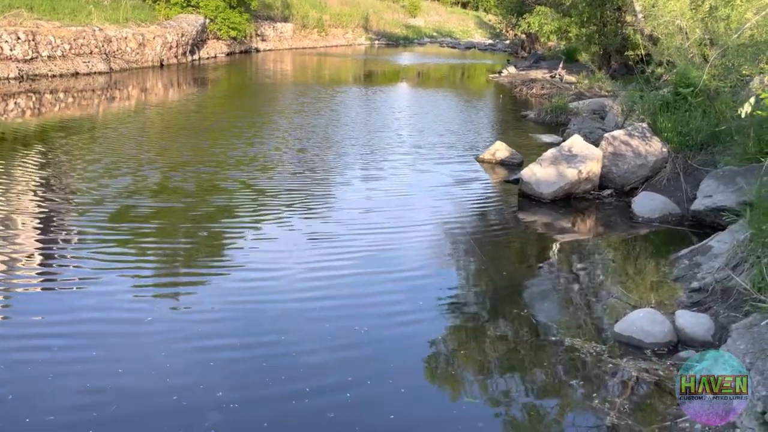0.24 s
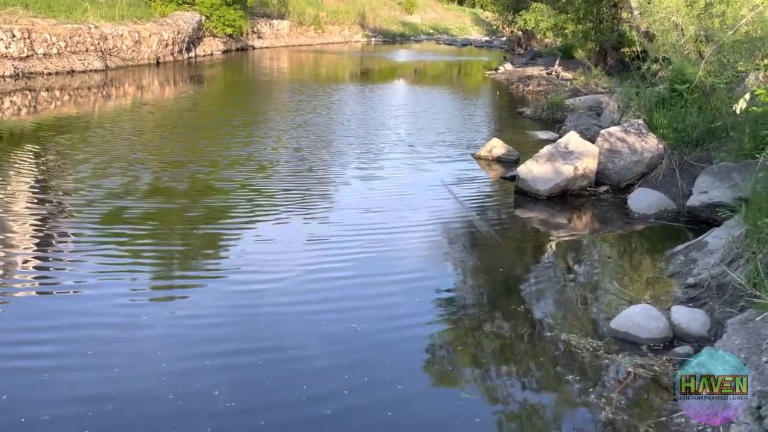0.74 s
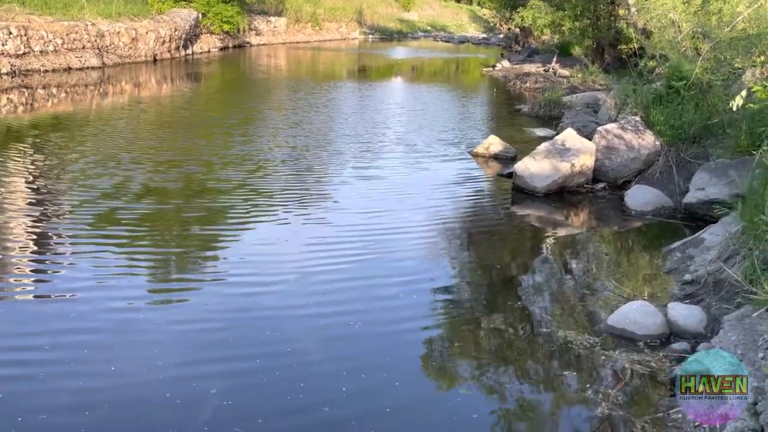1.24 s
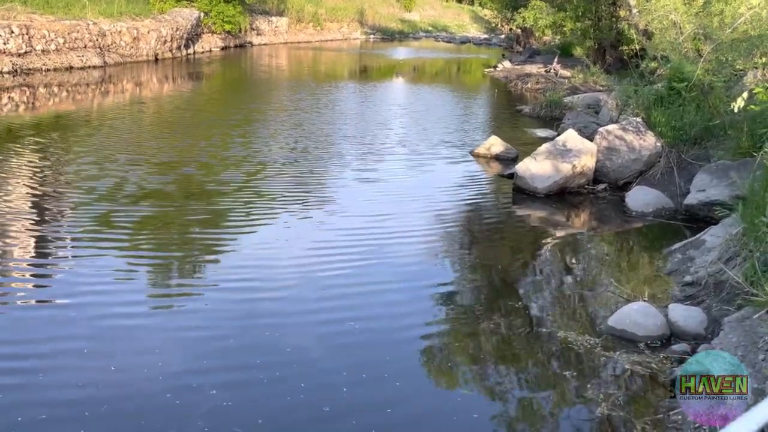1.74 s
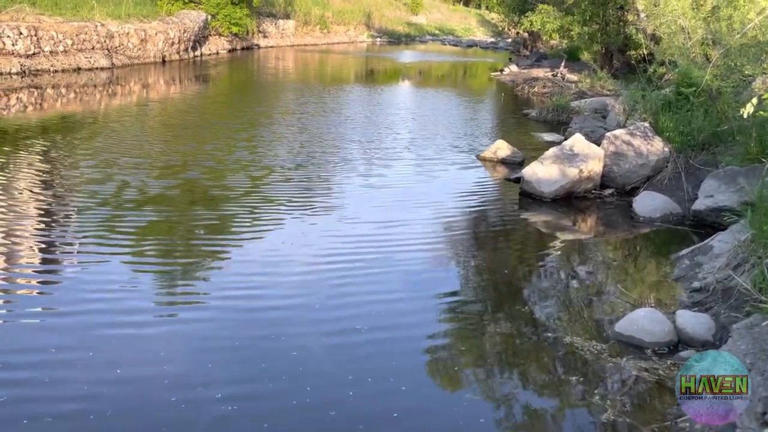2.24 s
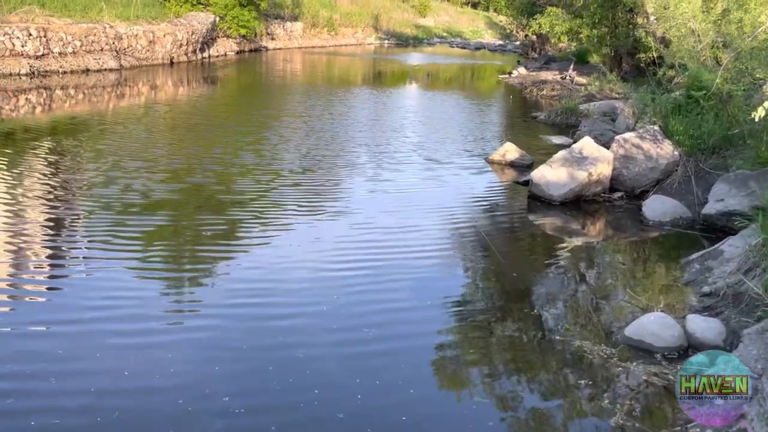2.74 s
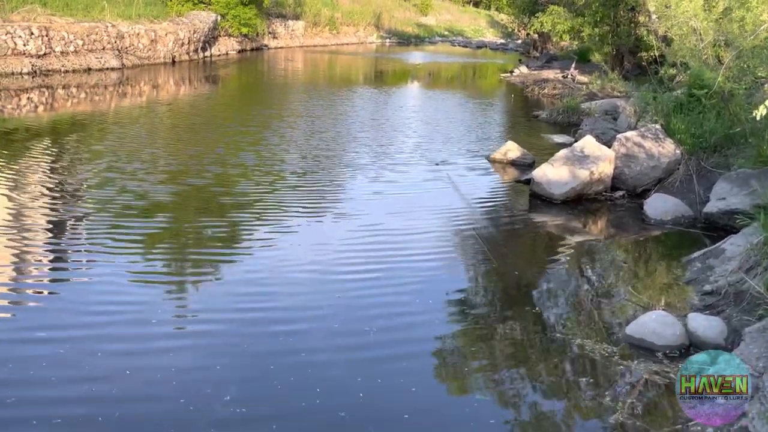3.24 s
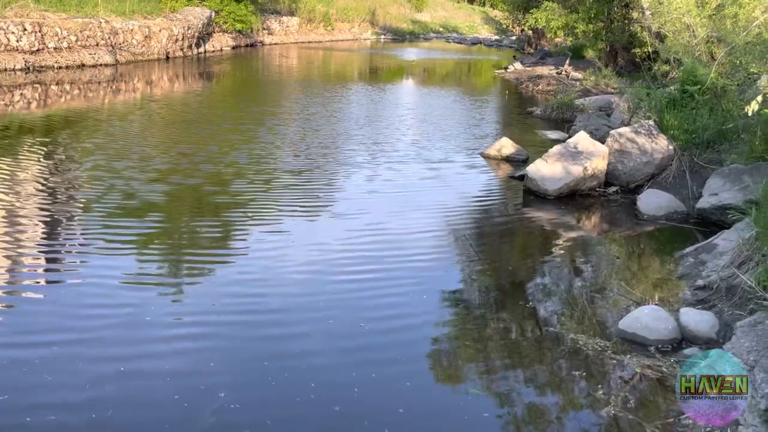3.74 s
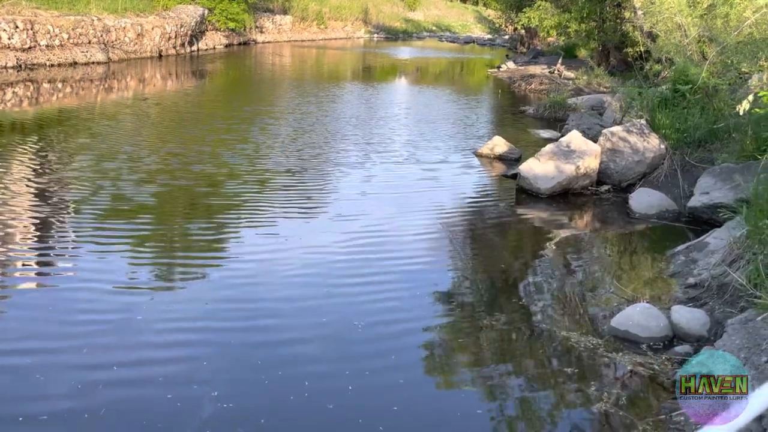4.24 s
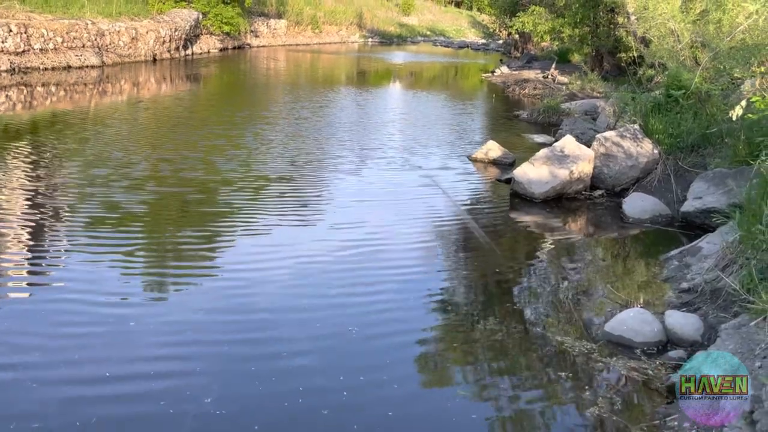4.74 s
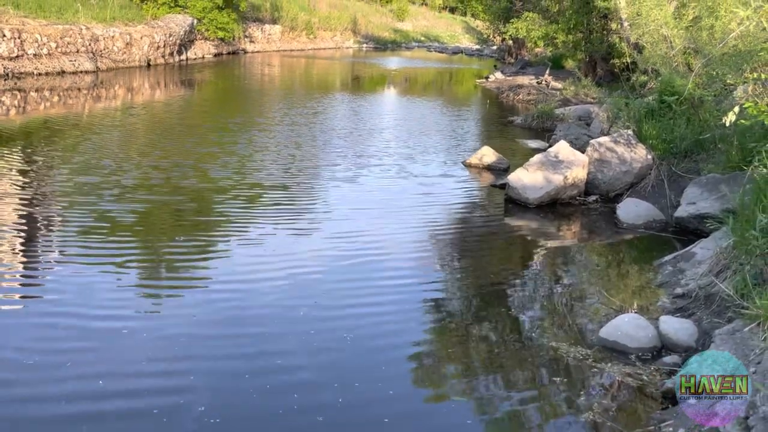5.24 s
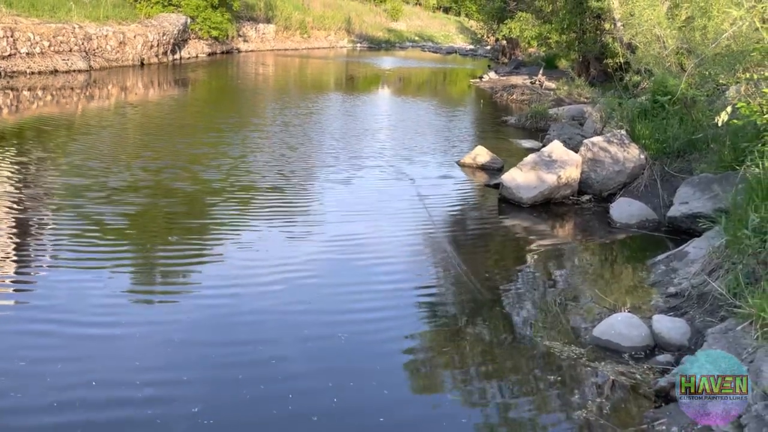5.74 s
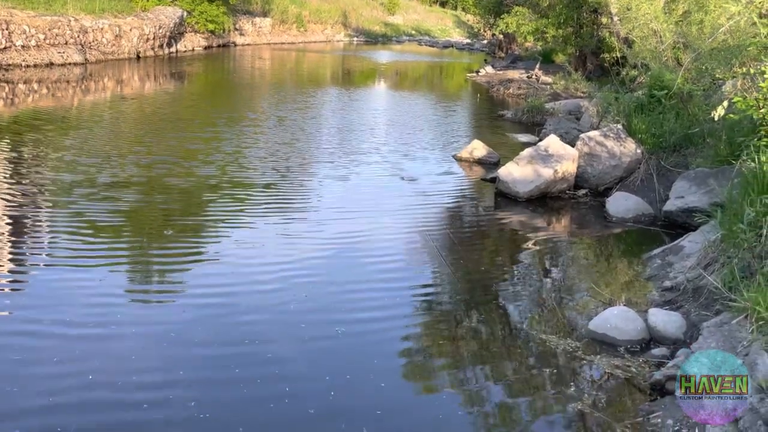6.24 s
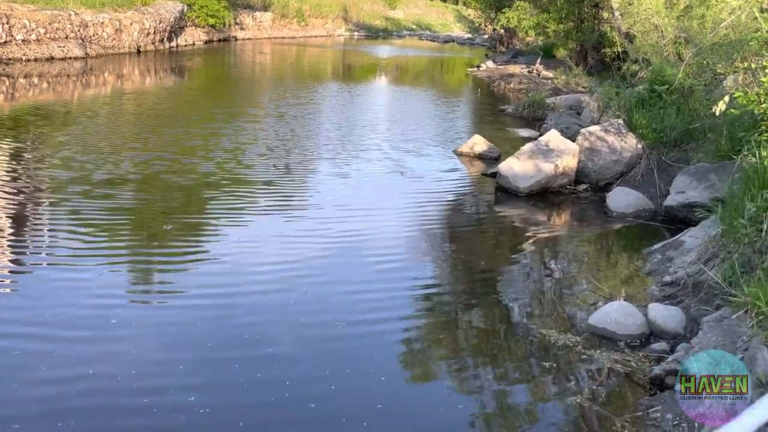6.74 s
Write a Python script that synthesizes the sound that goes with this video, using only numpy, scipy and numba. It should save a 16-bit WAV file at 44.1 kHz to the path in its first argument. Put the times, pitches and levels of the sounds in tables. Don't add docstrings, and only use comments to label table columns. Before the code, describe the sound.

A distant engine drones low past a quiet creek bank, its overtones fading in and out, while cloth rustles and tiny ticks sound close by.

```python
import sys
import numpy as np
from scipy import signal
from scipy.fft import rfft, irfft, next_fast_len
from scipy.io import wavfile
from scipy.ndimage import uniform_filter1d
from numba import njit

SR = 44100
rng = np.random.default_rng(int(sys.argv[2]) if len(sys.argv) > 2 else 0)


def makeup_ratio(level_db):
    decades = np.asarray(level_db, float) / 20
    return 10 ** decades


def generate_wav(sig):
    pcm = np.round(np.clip(np.atleast_2d(sig).T, -1, 1) * 32767).astype(np.int16)
    wavfile.write(sys.argv[1], SR, pcm)


N = 308259


def curves(table):
    s, *columns = np.transpose(table)
    return [np.interp(np.arange(N) / SR, s, column) for column in columns]


def level(x, db):
    return x * makeup_ratio(db) / np.sqrt(np.mean(x ** 2))


def walk(rate):
    hold = int(SR / rate)
    steps = np.repeat(rng.standard_normal(N // hold + 1), hold)
    slewed = uniform_filter1d(uniform_filter1d(steps, hold), hold)
    return 1.3 * slewed[:N]


def swells(rows, rest_db, rest_value=None):
    t = np.arange(0, N + 64, 64) / SR
    s, half, db, *values = np.transpose(rows)
    power = makeup_ratio(2 * db)[:, None] * np.exp(-((t - s[:, None]) / half[:, None]) ** 2)
    rest_power = makeup_ratio(2 * rest_db)
    total = power.sum(axis=0) + rest_power
    out = [10 * np.log10(total)]
    for value in values:
        out.append((value @ power + rest_value * rest_power) / total)
    return [np.interp(np.arange(N) / SR, t, column) for column in out]


@njit
def svf(x, hz, width):
    y, band, low = np.empty(len(x)), 0., 0.
    for i in range(len(x)):
        g, k = np.tan(np.pi * hz[i] / SR), width / hz[i]
        v = (band + g * (x[i] - low)) / (1 + g * (g + k))
        band, low, y[i] = 2 * v - band, low + 2 * g * v, k * v
    return y


def hollow(x, hz, width):
    return svf(svf(x, hz, width), hz, 2 * width)


def bands(spectrum, db, sway_db):
    size = next_fast_len(N)
    octave = np.log2(np.arange(1, size // 2 + 2) * SR / size)
    hz, tone_db = np.transpose(spectrum)
    noise = rfft(rng.standard_normal(size)) * makeup_ratio(np.interp(octave, np.log2(hz), tone_db))
    out = 0
    for centre in np.arange(np.log2(hz[0]), np.log2(hz[-1]) + .5, .5):
        share = np.cos(np.pi * np.clip(octave - centre, -.5, .5)) ** 2
        out = out + irfft(noise * share, size)[:N] * makeup_ratio(sway_db(2 ** centre))
    return level(out, db)


def drone():
    # start_s, pitch_hz
    firing = [(0.0, 96.6), (0.6, 96.5), (1.05, 95.4), (2.0, 95.3), (2.7, 94.6), (3.4, 94.1), (4.1, 93.6),
              (4.8, 93.0), (5.5, 92.5), (6.2, 91.9), (6.99, 91.6)]
    # overtone, left_minus_right_db, left_leads_rad
    overtone_sides = [(1, 1, -0.17), (2, 2.5, -0.48), (3, -1, 0.13), (4, 2.5, 0.16), (5, 8.5, 0.063),
                      (6, 4, 0.11)]
    # centre_s, overtone, half_length_s, level_db
    overtone_swells = [(0.08, 1, 0.13, -39), (0.64, 1, 0.038, -41), (1.18, 1, 0.29, -38.5), (2.47, 1, 0.06, -64),
                       (2.76, 1, 0.097, -38.5), (3.58, 1, 0.22, -35), (3.89, 1, 0.15, -33.5),
                       (4.34, 1, 0.11, -34), (4.63, 1, 0.11, -37.5), (5.02, 1, 0.037, -41), (5.4, 1, 0.14, -33),
                       (5.9, 1, 0.25, -33), (6.27, 1, 0.26, -24), (6.6, 1, 0.16, -27.5), (6.95, 1, 0.048, -31.5),
                       (0.53, 2, 0.082, -52.5), (1.19, 2, 0.17, -35), (2.15, 2, 0.16, -45.5),
                       (3.08, 2, 0.23, -38.5), (3.49, 2, 0.51, -41.5), (3.77, 2, 0.041, -37),
                       (4.52, 2, 0.1, -41), (4.84, 2, 0.098, -34.5), (5.05, 2, 0.15, -38.5),
                       (5.5, 2, 0.044, -42), (6.22, 2, 0.31, -34), (6.6, 2, .05, -40.5), (.92, 2, 0.11, -44.5),
                       (4.66, 2, 0.046, -43.5),
                       (1.25, 3, 0.14, -40.5), (1.03, 3, 0.066, -46), (1.49, 3, .1, -43),
                   (2.08, 3, 0.065, -44.5), (2.22, 3, 0.082, -39), (2.4, 3, .1, -40), (2.71, 3, 0.055, -44),
                   (3.22, 3, 0.09, -47.5), (5.55, 3, .04, -56), (5.7, 3, 0.04, -52), (4.57, 3, 0.27, -48),
                   (4.61, 3, 0.08, -43.5), (5.33, 3, 0.092, -49), (5.98, 3, 0.087, -40.5),
                   (6.42, 3, 0.063, -42.5), (6.66, 3, 0.065, -47.5), (0.95, 4, 0.094, -51.5),
                   (2.62, 4, 0.12, -45), (2.45, 4, 0.062, -50), (6.03, 4, 0.026, -52), (6.2, 4, .08, -52),
                   (2.94, 4, 0.084, -46.5), (4.29, 4, 0.17, -53.5), (4.77, 4, 0.1, -51),
                   (5.47, 4, 0.11, -50), (5.77, 4, 0.053, -51.5), (6.42, 4, 0.082, -45.5),
                   (2.23, 5, 0.076, -47.5), (2.7, 5, 0.087, -51), (2.98, 5, 0.06, -49),
                   (2.44, 5, 0.046, -55), (3.45, 5, 0.048, -54.5), (3.74, 5, 0.062, -51.5),
                   (4.15, 5, 0.035, -50), (5.02, 5, 0.054, -53), (6.43, 5, 0.077, -51),
                       (2.1, 4, .13, -50), (3.37, 4, .12, -52), (.62, 5, .1, -55), (5.85, 5, .2, -57),
                   (1.45, 5, .12, -57),
                       (2.606, 6, 0.074, -54.5), (2.77, 6, 0.046, -53.5), (4.5, 6, 0.087, -56.5),
                   (.95, 6, 0.12, -60), (5.5, 6, 0.11, -61), (3.1, 3, 0.087, -49), (2.7, 3, 0.24, -54.5),
                   (4.2, 3, 0.081, -50), (5.05, 3, 0.13, -53)]
    faded_db = [-58.5, -58.5, -69, -66, -68, -71]

    hz, = curves(firing)
    turn = 2 * np.pi * np.cumsum(hz) / SR
    rows = overtone_swells
    out = 0
    for (k, pan_db, lead), rest_db in zip(overtone_sides, faded_db):
        own_swells = [(s, half, db) for s, overtone, half, db in rows if round(overtone) == round(k)]
        line_db, = swells(own_swells, rest_db)
        phase = round(k) * turn + 0.35 * np.sqrt(k) * walk(6)
        port_lead = np.array([[.5], [-.5]]) * (lead + 0.11 * walk(0.9))
        pair = np.sin(phase + port_lead)
        flicker_db = .9 * walk(12)
        pan = makeup_ratio(np.array([[pan_db], [-pan_db]]) / 2)
        out = out + np.sqrt(2) * makeup_ratio(line_db + flicker_db) * pair * pan
    return out


def grit(rate, scatter_db, rough):
    size_db = scatter_db * np.minimum(rng.exponential(size=N), 4)
    snaps = (rng.random(N) < rate / SR) * makeup_ratio(size_db) * rng.choice([-1, 1], N)
    return np.sqrt(rough) * level(snaps, 0) + np.sqrt(1 - rough) * rng.standard_normal(N)


def rubs():
    # centre_s, half_length_s, level_db, hollow_hz
    strokes = [(0.051, 0.1, -83, 4430), (0.512, 0.026, -79, 4930), (0.578, 0.23, -81.5, 5140),
               (0.595, 0.025, -68.5, 5020), (0.635, 0.016, -72.5, 5950), (0.756, 0.012, -70, 5380),
               (1.09, 0.13, -81.5, 4450), (1.582, 0.18, -81.5, 4300), (2.285, 0.017, -67, 5780),
               (2.326, 0.02, -67.5, 5800), (2.34, 0.074, -77, 4880), (2.93, 0.016, -76.5, 4470),
               (3.082, 0.062, -72.5, 5080), (3.377, 0.19, -82.5, 4300), (3.696, 0.054, -79, 4190),
               (3.88, 0.16, -75.5, 3860), (3.962, 0.033, -75.5, 3960), (4.559, 0.025, -79.5, 4850),
               (4.645, 0.014, -73, 5030), (4.69, 0.046, -75, 5420), (5.449, 0.078, -76.5, 4210),
               (5.673, 0.064, -73.5, 4750), (5.98, 0.12, -80, 5390), (6.533, 0.177, -75.5, 5480)]
    scrape_db, hz = swells(strokes, rest_db=-91, rest_value=4300)
    hard = np.clip((scrape_db + 79) / 12, 0, .68)
    scrapes = []
    for _ in range(2):
        flutter_hz = hz * np.exp(0.05 * hard * walk(120))
        scrapes.append(level(hollow(grit(1100, 4.9, hard), flutter_hz, 1350.), 0))
    middle, side = scrapes
    return (middle + side * np.array([[1], [-1]])) * makeup_ratio(scrape_db - 0.8)


def crinkles():
    # centre_s, half_length_s, level_db
    folds = [(0.582, 0.136, -79), (0.633, 0.018, -64.5), (0.75, 0.012, -74.5), (1.057, 0.026, -81.5),
             (1.144, 0.032, -83), (1.186, 0.3, -91), (1.621, 0.1, -84), (2.335, 0.045, -74.5),
             (2.322, 0.011, -64), (2.581, 0.017, -92), (2.924, 0.0085, -81), (3.033, 0.012, -76.5),
             (3.06, 0.074, -79.5), (3.115, 0.014, -75), (3.258, 0.022, -80.5), (3.343, 0.028, -82.5),
             (3.794, 0.23, -83.5), (3.951, 0.078, -77), (4.653, 0.087, -88), (4.688, 0.009, -68),
             (4.709, .012, -69.5), (5.566, 0.17, -85), (5.639, 0.035, -74.5), (5.693, 0.008, -64.5),
             (5.709, .008, -67.5), (5.725, 0.014, -69), (4.607, .008, -77.5), (.525, 0.014, -76.5),
             (1.76, .03, -86), (2.297, 0.009, -63.5), (6.39, 0.075, -81.5), (6.433, 0.36, -91)]
    # centre_hz, width_hz, level_db
    fold_bands = [(7600., 2600., 1), (9700., 2800., 0), (12200., 3000., -2), (14600., 2600., -7.5)]
    crinkle_db, = swells(folds, rest_db=-101)
    snaps = grit(1800, 3.9, 0.6)
    crinkle = 0
    for k, (hz, width, db) in enumerate(fold_bands):
        band = hollow(snaps, np.full(N, hz), width)
        crinkle = crinkle + band * (-1) ** k * makeup_ratio(db + 2.2 * walk(60))
    crinkle = crinkle * makeup_ratio(1.3 * walk(70))
    return level(crinkle, 2.2) * makeup_ratio(crinkle_db)


def creaks():
    # centre_s, half_length_s, level_db
    seams = [(0.561, 0.31, -75.5), (0.62, 0.01, -67.5), (1.496, 0.45, -75), (2.303, 0.35, -75),
             (2.356, 0.03, -69.5), (3.05, 0.025, -68.5), (3.133, 0.35, -77.5), (3.663, 0.027, -76),
             (3.724, 0.016, -70), (3.855, 0.048, -74), (3.9, 0.1, -73), (3.934, 0.32, -79),
             (3.96, 0.028, -66), (4.617, 0.084, -81), (5.572, 0.24, -79), (5.65, 0.03, -73.5),
             (6.497, 0.26, -92.5)]
    creak_db, = swells(seams, rest_db=-90)
    rough = np.clip((creak_db + 76.5) / 11, 0, .55)
    creak = hollow(grit(900, 4.2, rough), np.full(N, 3200.), 1000.)
    return level(creak, -0.67) * makeup_ratio(creak_db)


def cloth():
    return rubs() + crinkles() + creaks()


def whistles():
    # start_s, length_s, level_db, first_hz, last_hz
    slides = [(0.568, .032, -68, 6000, 4000), (0.593, .026, -68, 4700, 6600),
              (0.617, 0.011, -62, 5000, 3100), (2.26, 0.026, -69, 6000, 7300),
              (2.286, 0.025, -63, 7200, 4900), (2.325, 0.019, -66.5, 4400, 3290),
              (3.042, 0.035, -68, 4800, 5500), (3.068, 0.038, -68, 5500, 4200),
              (3.088, 0.027, -70, 3100, 3000), (3.1, .03, -74, 6300, 6500), (4.623, 0.035, -70, 4100, 5760),
              (4.643, 0.029, -68, 6200, 4600), (5.636, 0.053, -64.5, 4500, 5800),
              (5.678, 0.02, -76, 5600, 4400), (5.625, 0.048, -66.5, 2950, 2800),
              (3.526, .018, -75, 9400, 9300), (2.299, 0.011, -66, 9800, 9600),
              (.636, .012, -66, 9900, 9800), (2.362, 0.014, -60.5, 2400, 2700),
              (4.658, .014, -66, 4700, 4600), (3.104, .01, -73, 13000, 11700)]
    out = np.zeros(N)
    for s, length, db, first_hz, last_hz in slides:
        n, i = min(int(length * SR), 4096), int(s * SR)
        hz = np.geomspace(first_hz, last_hz, n)
        breath = hollow(rng.standard_normal(n), hz, 480.)
        arch = np.sin(np.pi * np.arange(n) / n)
        out[i:i + n] += level(breath, db) * arch
    return out


def ticks():
    # start_s, peak_db, ring_hz, treble_db
    contacts = [(0.4929, -63, 3350, -74.5), (0.612, -55, 3500, -78), (0.619, -58, 3620, -66.5),
                (0.7556, -61, 2950, -72), (0.9052, -64, 3420, -97), (2.2423, -60, 3210, -67.5),
                (2.2659, -55, 4900, -79), (2.2894, -57, 4960, -78.5), (2.9214, -58, 2940, -66.5),
                (3.0364, -45, 2480, -64.5), (3.036, -57, 3290, -74), (3.14, -54, 3350, -64.5),
                (3.253, -63, 2940, -67), (3.6555, -50.5, 3700, -91), (3.711, -51, 3430, -84.5),
                (3.79, -55, 3300, -61.5), (3.8548, -53, 2990, -84.5), (3.9106, -55, 2990, -81),
                (3.9198, -58, 3080, -77), (3.9384, -59, 3180, -73.5), (3.948, -51, 2900, -64),
                (3.968, -51, 2940, -58), (3.986, -56, 2900, -52.5), (4.0488, -51, 2860, -62.5),
                (4.602, -66, 3030, -74.5), (5.465, -59, 3920, -78.5), (5.597, -66, 3200, -73),
                (5.642, -60, 2900, -76), (5.75, -54, 3970, -82), (6.101, -55, 3080, -84.5),
                (6.3951, -68.5, 2910, -71),
                (0.5231, -66.0, 6001, -70.0), (0.7409, -61.0, 5201, -67.0), (0.7572, -60.0, 5501, -68.0),
                  (1.0207, -66.0, 4001, -79.0), (2.368, -54.0, 2601, -76.0), (3.0221, -62.0, 4001, -77.0),
                  (3.1398, -52.0, 5801, -90.0), (3.6551, -66.0, 5901, -90.0), (3.6839, -58.0, 6401, -80.0),
                  (4.5636, -59.0, 4901, -88.0), (4.6339, -60.0, 5501, -81.0), (5.4212, -61.0, 3701, -88.0),
                  (5.6931, -72.0, 6001, -69.0), (5.7271, -72.0, 6001, -70.0),
                (0.4443, -78, 2860, -80.5), (0.4938, -58, 5000, -91), (0.5197, -59, 3200, -69.5),
                   (1.3049, -72, 3000, -81.5), (1.487, -71, 3000, -79.5), (1.6144, -70, 3000, -80.5),
                   (1.7085, -72, 3000, -74), (2.2004, -72, 3000, -81), (2.22, -72, 3000, -82),
                   (2.302, -64, 3500, -60), (2.321, -58, 4400, -61.5), (2.376, -70, 3000, -70.5),
                   (3.9106, -75, 3000, -72), (5.5938, -75, 3000, -74), (5.686, -75, 3000, -66),
                   (2.345, -60, 3300, -80), (2.9282, -59, 4820, -78), (3.0183, -66, 3200, -71),
                   (3.0373, -59, 4970, -89), (3.0594, -70, 3200, -74.5), (3.107, -68, 6300, -69),
                   (3.2195, -74, 3000, -83), (3.2375, -71, 3000, -74), (3.3425, -71, 3000, -77.5),
                   (3.532, -78, 3000, -74.5), (3.6356, -63, 2700, -88), (3.6603, -57, 3500, -88),
                   (3.685, -56, 2970, -90), (3.7235, -53, 3400, -78), (3.8105, -55, 2770, -80.5),
                   (3.9868, -55, 4490, -94), (4.647, -70, 3000, -74), (4.6545, -72, 3000, -70),
                   (4.6785, -69, 4500, -68), (4.684, -72, 3000, -69.5), (5.1432, -77, 3000, -79),
                   (5.5732, -60, 3800, -80.5), (5.6264, -64, 2900, -71.5), (6.2994, -61, 4740, -88.5),
                   (6.3565, -74, 3000, -72), (6.4381, -78, 3000, -76)]
    out, t = np.zeros((2, N + 512)), np.arange(512) / SR

    def strike(hz, decay_s, rise_s):
        return (np.exp(-t / decay_s) - np.exp(-t / rise_s)) * np.sin(2 * np.pi * hz * t)

    snap_shape = np.exp(-t / 0.00054) - np.exp(-t / 0.0001)
    snap_tones = np.sin(2 * np.pi * 10900 * t) + np.sin(2 * np.pi * 7200 * t)
    for s, db, hz, treble_db in contacts:
        noise = rng.standard_normal(512)
        pan_db = -2.5 + 3 * noise[0]
        ring = 1.5 * makeup_ratio(db) * strike(hz, 0.00083, 0.000083)
        ring += 2.3 * makeup_ratio(db - 12.5) * strike(6000, 0.00051, 0.00015)
        snap_noise = svf(noise, np.full(len(t), 10200.), 6000.)
        snap = 2.9 * makeup_ratio(treble_db) * snap_shape * (snap_tones + 1.4 * snap_noise)
        i = int((s + 0.001) * SR)
        out[:, i:i + 512] += ring * makeup_ratio(np.array([[pan_db], [-pan_db]]) / 2) + snap
    return out[:, :N]


def far_engines():
    # centre_s, half_length_s, level_db, pitch_hz, sag_hz_per_s
    engines = [(1.5, 0.22, -40.5, 87, 5.5), (2.1, 0.16, -47, 58, 3), (2.68, 0.075, -38, 81, 9),
               (3.55, .15, -47.5, 83, 10), (1.3, 0.22, -45, 62, 2), (3.6, .3, -47, 146, 3),
               (4.3, 0.24, -45.5, 112, 3.5), (5.5, 0.23, -48.5, 53, 14), (0.67, 0.18, -45.5, 114, 4.5),
               (.7, 0.11, -44, 120, -3), (.55, 0.18, -52, 240, 4), (3.2, .08, -43.5, 140, 5.5),
               (2.33, .06, -52.5, 570, 41), (2.66, .04, -53, 625, 10), (0.606, 0.039, -53.5, 500, -2)]
    t, out = np.arange(N) / SR, 0
    for s, half, db, hz, sag in engines:
        since = t - s
        phase = 2 * np.pi * (hz - sag * since / 2) * since + 0.44 * walk(5)
        bell = np.exp(-(since / half) ** 2 / 2)
        out = out + np.sqrt(2) * makeup_ratio(db) * bell * np.sin(phase)
    return out


def roars():
    # centre_s, half_length_s, level_db, centre_hz
    vehicles = [(.75, 0.23, -58.5, 598), (2.45, 0.23, -52.5, 320), (2.72, .25, -54.5, 537),
                (3.1, .12, -51, 419), (3.5, 0.19, -58, 331), (4.7, 0.23, -55, 290), (6.35, 0.14, -56, 620),
                (6.7, 0.22, -60.5, 680), (6.55, .2, -62, 950), (2.45, .05, -53, 440)]
    db, hz = swells(vehicles, rest_db=-82, rest_value=450)
    band = hollow(rng.standard_normal(N), hz, 220)
    return level(band, 0) * makeup_ratio(db + 2.0 * walk(25))


def road():
    # start_s, rumble_db, tyre_roar_db
    traffic = [(0.0, -43.5, -49), (.25, -44.5, -50), (0.5, -44, -48.5), (1.3, -43, -47),
               (1.55, -46.5, -48.5), (1.9, -44, -49), (2.3, -44, -48), (2.7, -43, -47.5), (3.05, -44, -46),
               (3.3, -44, -48), (3.58, -42, -47.5), (4.1, -44.5, -48), (4.63, -40.5, -48),
               (5.5, -43.5, -48.5), (6.0, -43, -48), (6.41, -43.5, -48.5), (6.99, -41, -50)]
    # pitch_hz, level_db_per_hz
    mid_colour = [(15, -52), (25, -25), (64, 1.5), (96, 0.5), (147, -8), (194, -9), (233, -11.5),
                  (290, -12), (334, -15), (460, -18), (575, -16.5), (717, -26), (932, -21), (1190, -32.5),
                  (1670, -30.5), (3050, -51.5), (3960, -81), (6710, -120)]
    side_colour = [(15, -47), (25, -16.5), (73, 0), (102, 0.5), (206, -4.5), (237, -7), (328, -8),
                   (480, -7.5), (777, -12), (1070, -12.5), (2120, -33), (3050, -41.5), (3960, -67),
                   (6710, -120)]
    rumble_db, tyre_db = (column - column.mean() for column in curves(traffic))

    def sway_db(hz):
        tyre_share = np.clip(np.log2(hz / 90) / 2, 0, 1)
        traffic_db = (1 - tyre_share) * rumble_db + tyre_share * tyre_db * min(1, 1500 / hz)
        return traffic_db + 0.98 * walk(2.88) + 1.1 * walk(9)

    mid = bands(mid_colour, -38, sway_db)
    side = bands(side_colour, -50, sway_db)
    return np.array([1.007 * mid + side, mid / 1.08 - side])


def air():
    # pitch_hz, level_db_per_hz
    hiss_colour = [(1800, -30), (2500, -3), (3200, -6), (4000, -10), (5000, -14), (6500, -19), (8000, -24),
                   (10000, -28), (13000, -33), (15700, -40)]

    def hiss(db):
        return bands(hiss_colour, db, lambda hz: 1.3 * walk(0.66))

    shared, left, right = hiss(-80), hiss(-79), hiss(-79)
    sag_db = -0.2 * (np.arange(N) - N / 2) / SR
    return (shared + np.array([left, right])) * makeup_ratio(sag_db)


def scene():
    near = cloth() + whistles() + ticks()
    far = far_engines() + roars() + road() + air()
    return drone() + near + far


def ports(x):
    # pitch_hz, left_leads_rad, left_minus_right_db
    openings = [(400, 0, 0), (880, 0, -3.2), (1200, 1.6, 1.5), (1500, .1, 3), (2400, .2, -2),
                (3500, -.2, -3), (5000, -.4, -3), (6300, 1.2, -1.5),
                (7300, 2.65, 0), (8100, 3.14, 0), (11300, 6.28, 0), (14500, 9.42, 0), (16000, 11.2, 0)]
    pad = 4096
    size = next_fast_len(N + 2 * pad)
    hz, lead, pan_db = np.transpose(openings)
    f = np.arange(size // 2 + 1) * SR / size
    half = makeup_ratio(np.interp(f, hz, pan_db) / 2) * np.exp(.5j * np.interp(f, hz, lead))
    x = np.pad(x, ((0, 0), (pad, pad)), mode="reflect")
    return irfft(rfft(x, size) * np.array([half, 1 / half]), size)[:, pad:pad + N]


def roll_off(x):
    return signal.sosfilt(signal.butter(12, 15750, fs=SR, output="sos"), x)


def record(dry):
    x = ports(dry)
    clock = np.cos(2 * np.pi * 12000 * np.arange(N) / SR)
    mix = x * (1 + makeup_ratio(-67.5) * clock)
    return roll_off(mix)


dry = scene()
out = record(dry)
generate_wav(out)
```